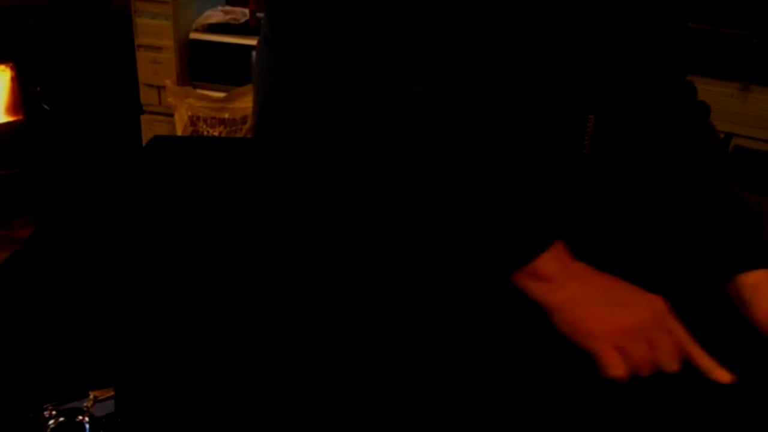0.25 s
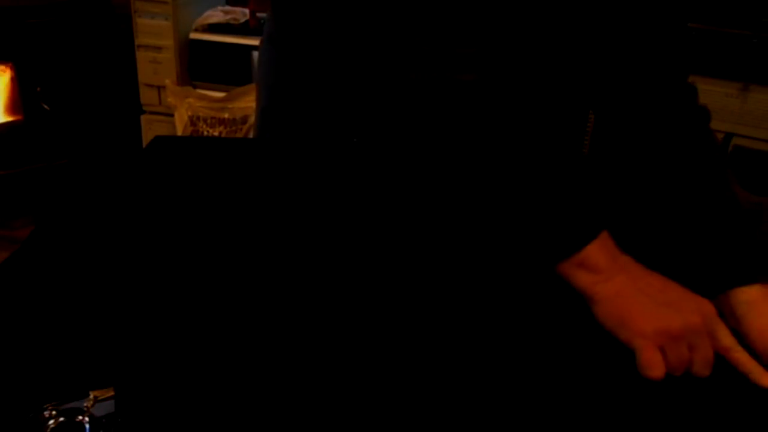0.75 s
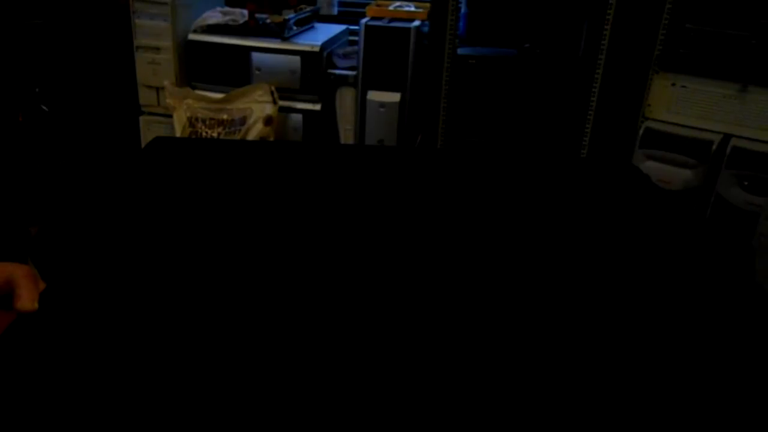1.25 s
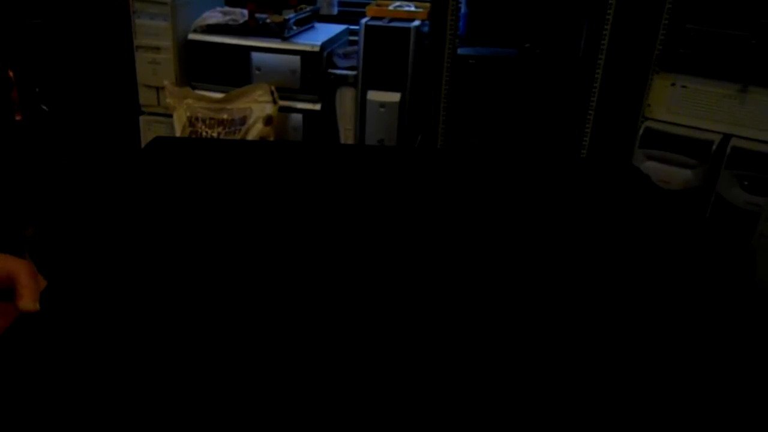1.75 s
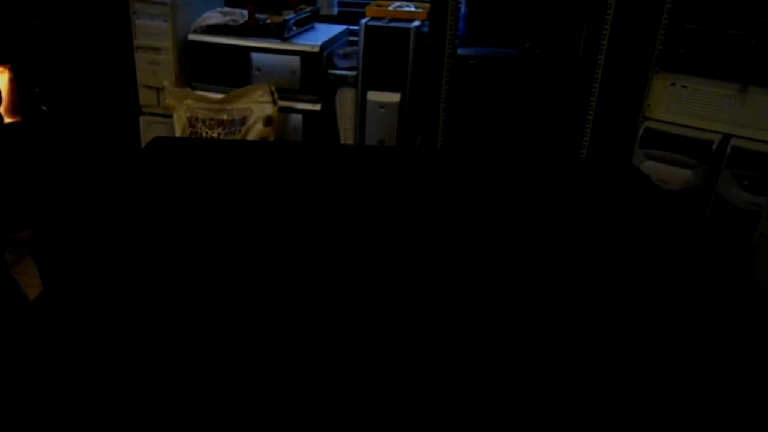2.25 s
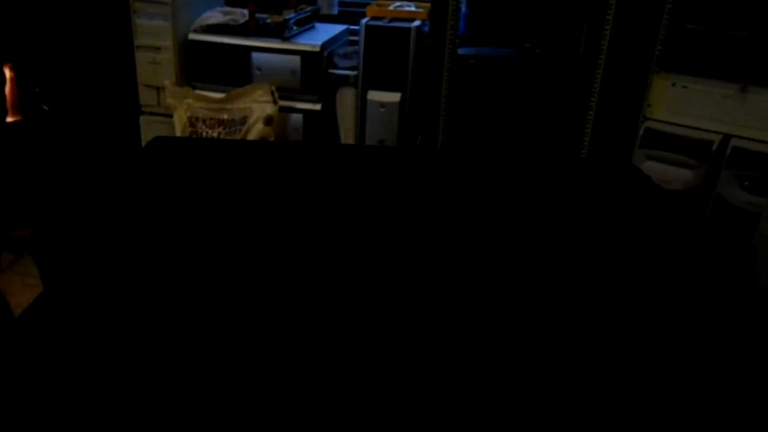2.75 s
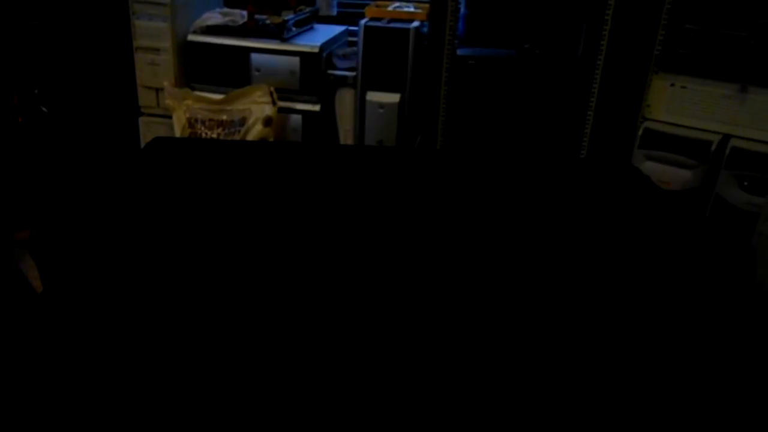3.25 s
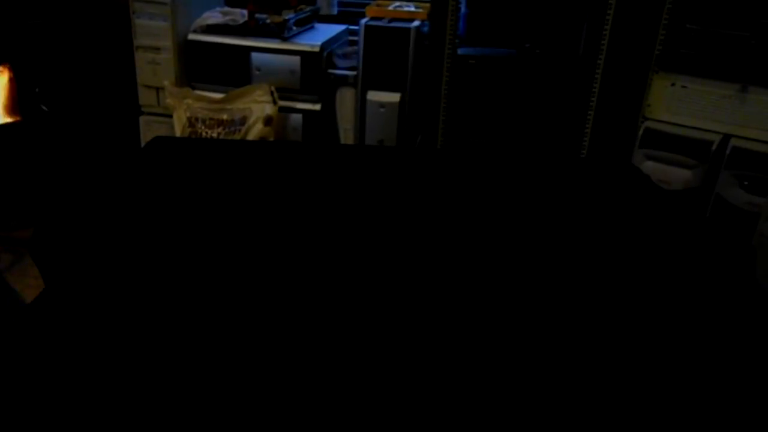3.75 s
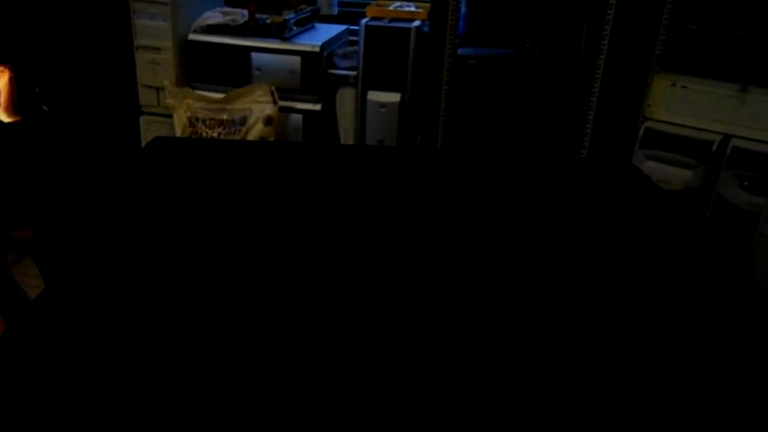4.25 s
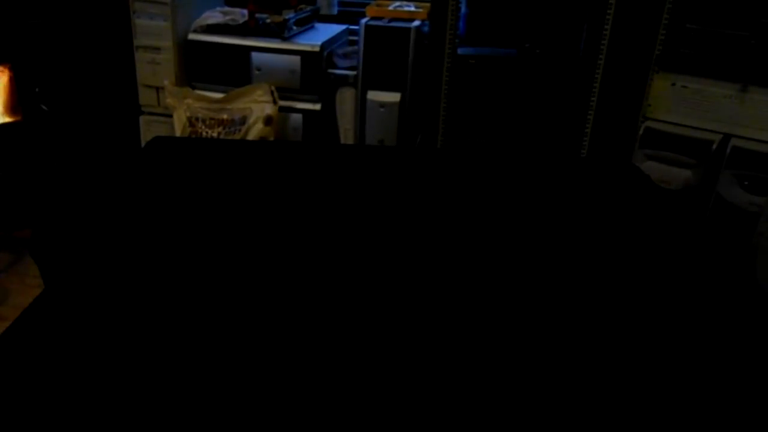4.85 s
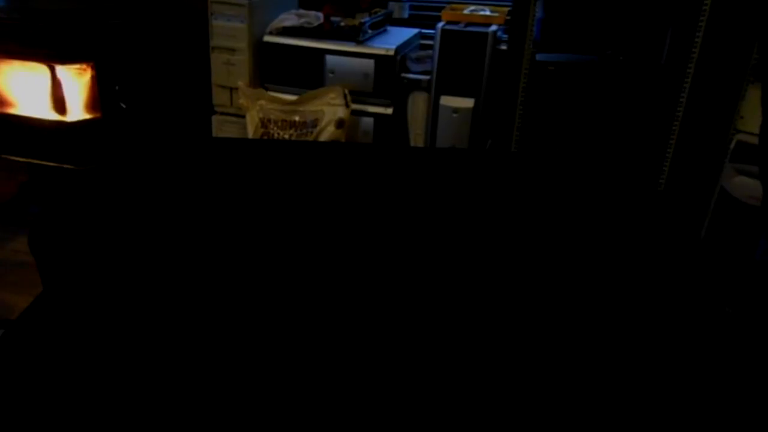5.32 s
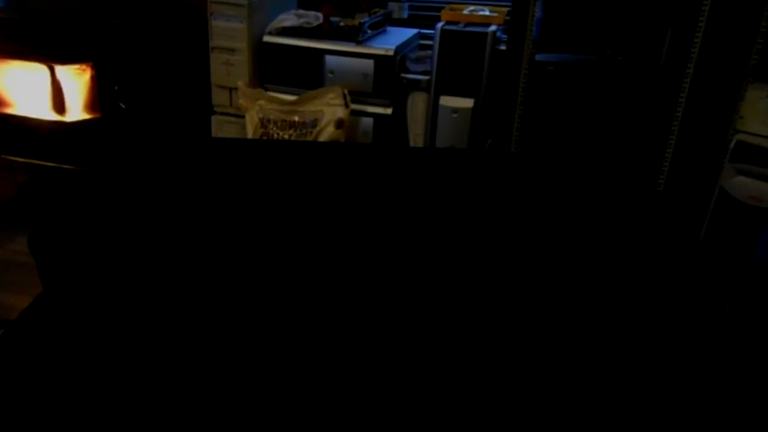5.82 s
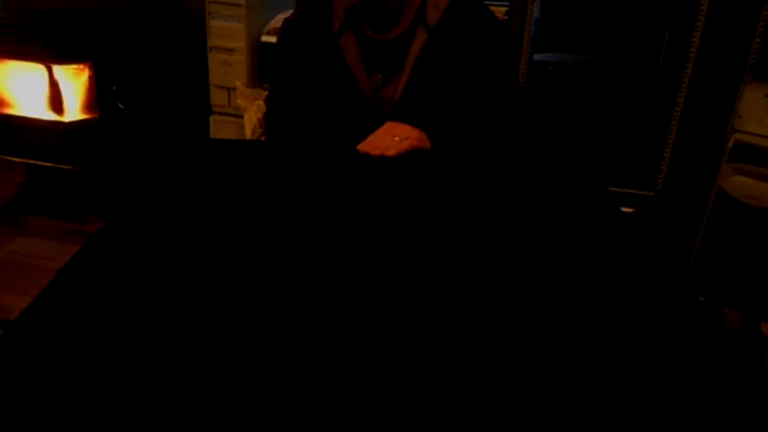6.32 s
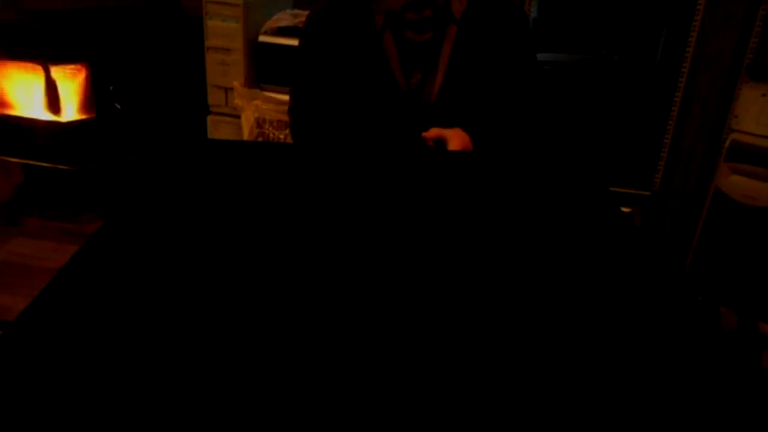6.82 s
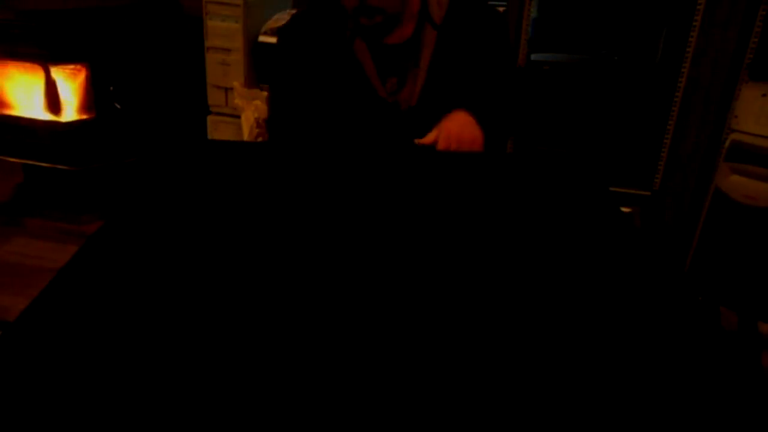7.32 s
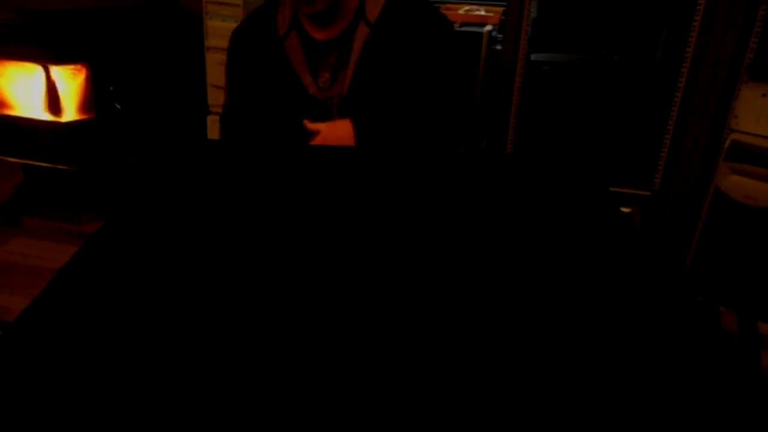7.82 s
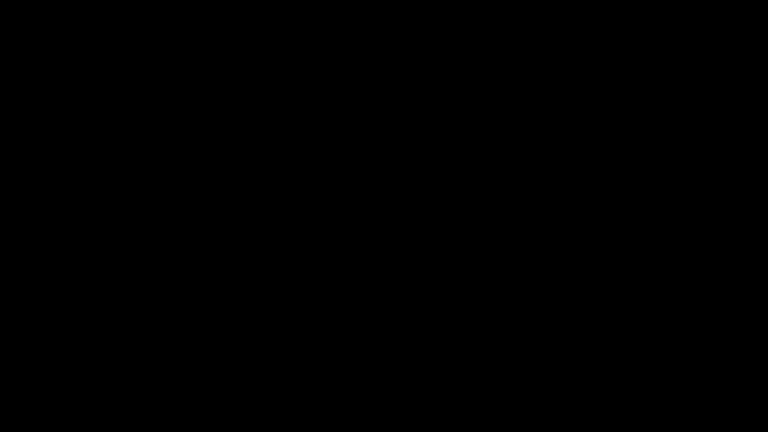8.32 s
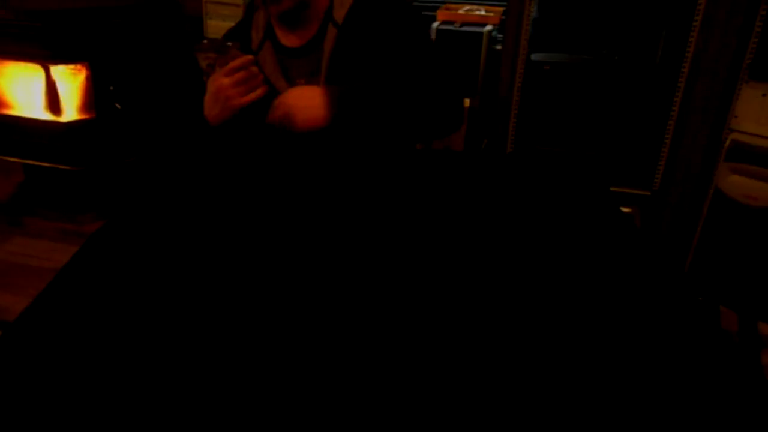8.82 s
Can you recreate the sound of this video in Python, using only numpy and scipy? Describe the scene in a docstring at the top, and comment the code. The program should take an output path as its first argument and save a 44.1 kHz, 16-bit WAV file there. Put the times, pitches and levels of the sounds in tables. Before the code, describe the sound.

In an indoor workshop, a hand staple gun fires nine loud shots through carpet into a wooden table. Before each, steel catches click as the lever is squeezed; afterwards it clacks and rings back. Soft bumps and hand strokes fill the gaps over a stove's low roar and fan hum. The close microphone overloads and ducks, and two brief dropouts fall silent.

```python
"""Staple gun in a workshop

A hand staple gun fires nine staples through carpet into a wooden table while a stove roars and its fan hums.
Steel contacts are noise bursts with pings and rattle; table, frame and lever are decaying sine modes.
The stove is shaped noise with wavering tones; bumps are low pulses, hand strokes hiss, the hinge squeaks.
Loud snaps duck the whole mix, the shots still overload, the roar steps in level and two gaps are silent."""
import sys
import numpy as np
from scipy import signal
from scipy.fft import rfft, irfft, next_fast_len
from scipy.io import wavfile
from scipy.ndimage import uniform_filter1d

SR = 44100
rng = np.random.default_rng(int(sys.argv[2]) if len(sys.argv) > 2 else 0)


def to_wav(s):
    """Save 16-bit WAV."""
    ch = np.atleast_2d(s).T  # columns
    pcm = np.round(np.clip(ch, -1, 1) * 32767)  # PCM
    wavfile.write(sys.argv[1], SR, pcm.astype(np.int16))


N = 399987
T = np.arange(SR) / SR  # one second of time for every blow

# roar and hiss of the stove: pitch_hz, level_db per Hz
STOVE_SPECTRUM = [(20, 0), (45, -15), (82, -3), (150, -2), (200, -6), (300, -5.5), (500, -5.5),
                  (880, -11.5), (1550, -19.5), (1900, -18.5), (3400, -24), (4400, -30.5), (5600, -31),
                  (8000, -36), (15000, -43)]
# tones of the stove's fan: pitch_hz, level_db against the roar
FAN_TONES = [(119.8, -10.5), (167.8, -9.5), (239.8, -11.5), (335, -16.5), (461, -14.5), (504, -13.5),
             (634, -13.5), (1341, -23.5), (2718, -26), (3480, -41)]
# the roar steps to a new level: start_s, relative level_db
ROAR_STEPS = [(0, -23.5), (.935, -25.5), (2.1, -23.5), (3.006, -26.5), (3.8, -25), (4.945, -26.5),
              (5.612, -24), (6.079, -23.5), (6.88, -22.5), (7.452, -22), (8.684, -28.5)]
# a hand brushes the carpet: start_s, end_s, level_db
STROKES = [(0.25, 0.587, -39.5), (0.684, 0.962, -41.5), (1.99, 2.098, -37), (6.118, 6.3, -35),
           (7.93, 8.36, -36), (8.234, 8.34, -30), (8.672, 8.731, -33.5), (8.699, 9.055, -44)]
# hiss of carpet fibres: pitch_hz, level_db per Hz
PILE_SPECTRUM = [(500, -17), (2500, 2), (5500, 3), (9000, 1), (14000, -6)]
# hands and gun bump the table: start_s, level_db, pitch_hz
BUMPS = [(.862, -17, 94), (1.67, -9.5, 115.4), (2.588, -7, 119), (3.079, -16, 102), (3.441, 2.5, 83),
         (3.457, -4.5, 187), (3.529, -14, 125), (4.422, -20, 88.5), (4.87, -22.5, 40), (7.65, -4, 145),
         (8.235, -24, 129), (8.713, -25.5, 109), (8.784, -28, 50.2)]
# the lever's hinge squeaks faintly: start_s, length_s, level_db, start_hz, end_hz
SQUEAKS = [(1.0, 0.083, -46, 3500, 3610), (2.062, 0.048, -33.5, 4830, 5100),
           (3.656, 0.029, -18, 3680, 3480)]
# the lever catches as it is squeezed or shifted:
# start_s, level_db, room_db, table_knock_db, ping_hz, ping_db
CATCHES = [(1.015, -31, -14.5, -20, 3540, 7), (1.2627, -6.5, -8, -8, 4250, -6),
           (2.2872, -5, -12.5, -23, 6550, -9.5), (2.596, -8.5, 0.5, -6, 8760, 3),
           (2.68, -25, 6, -20, 7000, -8), (3.013, -23.5, -13, -22, 3520, 5),
           (3.098, -7, -6, -9, 8830, -9.5), (3.553, -26, -18, -15, 7000, -8),
           (3.878, -17, -9, -12.5, 8250, -12.5), (4.037, -4.5, -3.5, -10.5, 2890, -3),
           (4.421, -24, 1, -20, 5760, 1), (4.478, -21, 0, -22, 7100, -7), (4.718, -29, 6, -20, 3300, 6),
           (5, -29.5, -15, -23, 7800, -3), (5.2827, -8.5, -6, -19, 1840, -2.5),
           (5.7171, -4.5, -9, -12, 1800, -4), (6.111, -10.5, 4, -2.5, 2120, -5.5),
           (6.9569, -10, -1, -9, 3060, -5), (7.4876, -10, 4.5, -2, 1820, 0.5),
           (8.932, -25, 3.5, -14, 3040, -3)]
# rasp of the catch: pitch_hz, level_db per Hz
CATCH_SPECTRUM = [(60, -20.5), (400, -1), (1200, -4.5), (1750, -4.5), (2100, -4), (3400, -6), (4100, -13),
                  (5500, -9.5), (6600, -10), (7200, -12), (8200, -7), (12000, -14.5)]
# base decay of the room: pitch_hz, t60_s
ROOM_T60 = [(100, 0.4), (1200, 0.48), (2000, 0.26), (4000, 0.52), (8000, 0.23), (14000, 0.22)]
# the lever springs back: start_s, level_db, room_db, ping_hz, ping_db
RETURNS = [(1.8042, -19.5, 7, 7700, -5), (1.83, 5, -7, 5250, -11), (2.7117, -0.5, -1.5, 5450, 2.5),
           (3.666, -2.5, -3.5, 3186, 5), (4.7422, -3, -0.5, 1847, -12), (4.75, -1.5, -11, 5150, 2.5),
           (4.755, -4.5, -2, 2470, -3), (7.365, -8, 5.5, 3000, -2), (7.969, -10, 9.5, 3020, -2),
           (8.845, -11.5, -3.5, 10030, -4)]
# clack of the returning lever: pitch_hz, level_db per Hz
CLACK_SPECTRUM = [(200, -31.5), (850, -18.5), (1150, 1), (1800, -5.5), (2400, -7.5), (3300, -4),
                  (4500, -8.5), (5100, -5), (6500, -7.5), (8500, -6.5), (12000, -9.5)]
# modes of the lever, free to ring once the hand lets go: pitch_hz, level_db, t60_s
LEVER_MODES = [(1043, -7.5, .3), (1187, -5.5, 0.48), (1236, -2.5, .36), (1350, -12, .25)]
# modes of the gun's steel frame: pitch_hz, level_db, t60_s
STEEL_MODES = [(1245, -5.5, 0.47), (1794, -4, 0.25), (1897, -7, 0.21), (2205, -8.5, .25), (2276, -7, 0.4),
               (2380, -6.5, 0.22), (2640, -4.5, 0.21), (3005, -4.5, 0.34), (3250, -3.5, 0.24),
               (4190, -4, 0.29), (5200, -20.5, .15), (5730, -8.5, 0.27)]
# modes of the table under the gun: pitch_hz, level_db, t60_s
TABLE_MODES = [(218, -4.5, 0.11), (285.2, -4, 0.32), (315, -9.5, 0.44), (390, 0, 0.3), (452.5, -6.5, 0.12),
               (517, -4, 0.25), (572, -1, 0.18), (622, -17.5, 0.12), (678, -6, 0.19), (825, -6, .35),
               (875, -10.5, 0.45), (914, -15, 0.16)]
# modes of the whole tabletop: pitch_hz, level_db, t60_s
THUD_MODES = [(78.8, 3, 0.36), (86.8, -2.5, 0.73), (106, -1.5, 0.23), (132.6, -1.5, 0.33), (150.4, 0, 0.4)]
# one row a staple: start_s, force_db, table_thud_db, extra knock_db around 720 Hz,
# length as a factor on the slam's decay, extra boom_db around 395 Hz
SHOTS = [(1.4075, 11.5, -6, -2.5, 1.06, 3.5), (2.363, 12, 6.5, -5, 1.17, -2), (3.209, 12, 3, -1.5, 1.07, 3),
         (4.1086, 11.5, -7, -2.5, 1.034, -2.5), (5.3197, 11, -9, 2, 1.114, 2.5),
         (5.83, 11, -7, 0.5, 1.14, -2.5), (6.303, 10.5, -3.5, 4.5, 1.06, 1.5),
         (7.032, 12.5, -14, 1.5, 1.084, 1), (7.599, 11, -8, 4.5, 1.01, -3.5)]
# slam of the striker: pitch_hz, level_db per Hz
SLAM_SPECTRUM = [(40, -36.5), (100, -11.5), (170, -14.5), (250, -5), (420, -1), (650, -6), (1000, -8.5),
                 (1500, -14), (2500, -13.5), (4300, -15.5), (7500, -13.5), (12000, -20)]
# base decay of the slam: pitch_hz, t60_s
SLAM_T60 = [(80, 0.46), (350, 0.39), (1000, 0.41), (3000, 0.41), (7000, 0.27), (13000, 0.23)]
# gaps without sound: start_s, end_s
SILENCES = [(6.843, 6.88), (8.311, 8.684)]
# tone of the microphone: pitch_hz, level_db
MICROPHONE_TONE = [(15, -3.5), (35, 7), (70, -0.5), (8500, 0.5), (10000, -2), (11100, -14), (12000, -8.5),
                   (13500, -16), (15300, -38.5)]

# gain control: treble peaks over the threshold turn the mix down, at most by the depth
THRESHOLD_DB, DEPTH_DB, DETECTOR_HZ = -11, 14.5, 1000
ATTACK_S, HOLD_S, RECOVER_DB_PER_S = 0.019, 0.2, 38.5
LOOKAHEAD_S = 0.011
STEP_DB_PER_S = 300.5  # the gain opens this fast after a step of the roar
EDGE_HZ = 15700  # top of the final band


def gain_of(db):
    """Turns decibels into an amplitude factor."""
    return 10 ** (np.asarray(db) / 20)


def evened(x):
    """Scales a signal to rms 1."""
    return x / np.sqrt(np.mean(x ** 2) + 1e-20)


def read(points, hz):
    """Reads a table on a log-frequency axis."""
    f, value = np.transpose(points)
    return np.interp(np.log(hz + 1), np.log(f + 1), value)


def add(mix, s, sound):
    """Lays a sound into the mix at time s."""
    part = mix[round(s * SR):][:len(sound)]
    part += sound[:len(part)]


def coloured(x, spectrum):
    """Filters a signal by a table of pitch_hz, level_db."""
    hz = np.fft.rfftfreq(len(x), 1 / SR)
    return irfft(rfft(x) * gain_of(read(spectrum, hz)), len(x))


def noise(spectrum, size=SR):
    """Makes noise of about rms 1 with the given spectrum."""
    white = rng.standard_normal(next_fast_len(size))
    return evened(coloured(white, spectrum))[:size]


def dying(x, t60s, stretch=1, patchy_db=2.5):
    """Lets each band die at its own speed, unevenly, as close modes beat."""
    hz, t, z = signal.stft(x, SR, nperseg=256)
    patches = evened(uniform_filter1d(rng.standard_normal(z.shape), size=9, axis=1))
    fall_db = -60 * t / (stretch * read(t60s, hz)[:, None])
    faded = z * gain_of(fall_db + patchy_db * patches)
    return signal.istft(faded, SR, nperseg=256)[1][:len(x)]


def ring(modes, rise_s, scatter=.004):
    """Rings struck modes; each blow lands on another spot, so their mix varies by about a decibel."""
    hz, db, t60 = np.transpose(modes)[:, :, None]
    detune, spot_db, phase = rng.standard_normal((3, len(modes), 1))
    tones = np.sin(2 * np.pi * (hz * (1 + scatter * detune) * T + phase))
    partials = tones * gain_of(db + spot_db) * np.exp(-np.log(1000) * T / t60)
    return partials.sum(0) * (1 - np.exp(-T / rise_s))


def ping(hz, db, ping_s=0.0037):
    """One part of the gun rings for a moment above the rest, as a decaying sine."""
    return gain_of(db) * np.sin(2 * np.pi * hz * T) * np.exp(-T / ping_s)


def rattle(per_s=160, rattle_s=0.023):
    """Loose staples and the spring chatter after a blow: random tiny clacks that die away."""
    struck = rng.random(SR) < per_s / SR
    hits = struck * rng.standard_normal(SR) * np.exp(-T / rattle_s)
    tick = noise(CLACK_SPECTRUM) * np.exp(-T / 0.002)
    return signal.fftconvolve(hits, tick)[:SR]


def stove(roar_db=-1.09, waver=0.24):
    """The fire roars as shaped noise, its fan hums in wavering tones, and both step in level together."""
    t = np.arange(N) / SR
    sound = noise(STOVE_SPECTRUM, size=N)
    knots = np.linspace(0, t[-1], 60)
    for hz, db in FAN_TONES:
        # the phase wanders at random, so the pitch wavers
        drift = np.interp(t, knots, np.cumsum(waver * rng.standard_normal(len(knots))))
        sound = sound + gain_of(db) * np.sqrt(2) * np.sin(2 * np.pi * hz * t + 2 * drift)
    starts, step_db = np.transpose(ROAR_STEPS)
    return sound * gain_of(roar_db + step_db[np.searchsorted(starts[1:], t)])


def strokes():
    """Carpet fibres hiss under a sliding hand: noise that fades in and out."""
    out = np.zeros(N)
    for start, end, db in STROKES:
        size = max(round((end - start) * SR), 2)
        hiss = noise(PILE_SPECTRUM, size=size) * signal.windows.tukey(size, .4)
        add(out, start, gain_of(db) * hiss)
    return out


def bumps(push_s=0.02):
    """Soft pushes through the carpet: a low tone and dull noise that swell and fade."""
    out = np.zeros(N)
    for s, db, hz in BUMPS:
        dull = noise([(20, -18), (hz, 0), (400, -12), (1500, -34), (8000, -55)])
        flex = np.sin(2 * np.pi * hz * T) + 0.71 * dull
        swell = (T / push_s) ** 2 * np.exp(2 * (1 - T / push_s))  # peaks at push_s
        add(out, s, gain_of(db) * flex * swell)
    return out


def squeaks(wobble=0.13):
    """Steel sticks and slips in the hinge: a short whistle that glides with an unsteady pitch."""
    out = np.zeros(N)
    for s, length, db, start_hz, end_hz in SQUEAKS:
        size = max(round(length * SR), 2)
        unsteady = evened(uniform_filter1d(rng.standard_normal(size), size=20))
        hz = np.linspace(start_hz, end_hz, size) * (1 + wobble * unsteady)
        whistle = np.sqrt(2) * np.sin(2 * np.pi * np.cumsum(hz) / SR)
        add(out, s, gain_of(db) * whistle * signal.windows.tukey(size, .5))
    return out


def catches(snap_s=0.0057, snap_db=-1.0, room_db=-8, rattle_db=-9):
    """A short rasp of steel on steel, passed on to the table and the room."""
    out = np.zeros(N)
    for s, db, wet_db, knock_db, ping_hz, ping_db in CATCHES:
        rasp = gain_of(snap_db) * noise(CATCH_SPECTRUM) * np.exp(-(T / snap_s) ** 2)
        snap = rasp + ping(ping_hz, ping_db)
        room = dying(noise(CATCH_SPECTRUM), ROOM_T60, 0.77) * (1 - np.exp(-T / 0.0014))
        tail = gain_of(room_db) * room + gain_of(rattle_db) * rattle()
        # the hand damps the table
        knock = gain_of(knock_db) * ring(TABLE_MODES, 0.0041, scatter=0.027) * np.exp(-T / 0.047)
        add(out, s, gain_of(db) * (snap + gain_of(wet_db) * tail + knock))
    return out


def returns(snap_s=0.0039, snap_db=3, room_db=-11, steel_db=-19, rattle_db=-3, lever_db=-18):
    """The lever hits its stop with the gun lifted: no table bass; lever and frame ring."""
    out = np.zeros(N)
    for s, db, wet_db, ping_hz, ping_db in RETURNS:
        clack = gain_of(snap_db) * noise(CLACK_SPECTRUM) * np.exp(-T / snap_s)
        snap = clack + ping(ping_hz, ping_db)
        tail = gain_of(room_db) * dying(noise(CLACK_SPECTRUM), ROOM_T60)
        tail = tail + gain_of(steel_db) * ring(STEEL_MODES, 0.0012) + gain_of(rattle_db) * rattle()
        lever = gain_of(lever_db) * ring(LEVER_MODES, .002, scatter=0.012)
        add(out, s, gain_of(db) * (snap + gain_of(wet_db) * tail + lever))
    return out


def shots(slam_db=2, table_db=0, steel_db=-12, crack_db=-5, crack_s=0.0065, swell_s=0.0042,
          late_db=-23, late_stretch=2.56, alike=0.55):
    """The striker cracks on the staple; gun, table and room then ring together in a dense slam."""
    out, hz = np.zeros(N), np.fft.rfftfreq(SR, 1 / SR)
    knock_band = np.exp(-(np.log2((hz + 1) / 720) / 0.42) ** 2)
    boom_band = np.exp(-((hz - 395) / 70) ** 2)
    # it is always the same table in the same room, so the shots share much of their dense ringing
    common, share = noise(SLAM_SPECTRUM), np.clip(alike, 0, 1)
    for s, force_db, thud_db, knock_db, length, boom_db in SHOTS:
        dense = np.sqrt(share) * common + np.sqrt(1 - share) * noise(SLAM_SPECTRUM)
        late = dying(noise(SLAM_SPECTRUM), SLAM_T60, late_stretch)
        slam = dying(dense, SLAM_T60, length) + gain_of(late_db) * late
        table = gain_of(table_db) * ring(TABLE_MODES, 0.005)
        steel = gain_of(steel_db) * ring(STEEL_MODES, .001)
        body = gain_of(slam_db) * slam + table + steel
        # the spot that is stapled decides how much the wood knocks and how much its main mode booms
        body = irfft(rfft(body) * gain_of(knock_db * knock_band + boom_db * boom_band), SR)
        body = body * (1 - np.exp(-T / swell_s)) * (1 - T)
        crack = gain_of(crack_db) * noise(CATCH_SPECTRUM) * np.exp(-T / crack_s)
        thud = gain_of(thud_db) * ring(THUD_MODES, 0.004, scatter=0.031)
        add(out, s, gain_of(force_db) * (body + crack) + thud)
    return out


def gain_control(x, size=44):
    """Loud snaps duck the whole sound, which swells back; after a step of the roar the gain opens fast."""
    high_pass = signal.butter(2, DETECTOR_HZ, "high", fs=SR, output="sos")
    treble = signal.sosfilt(high_pass, x)
    blocks, step_s = np.arange(0, N, size), size / SR
    peaks_db = 20 * np.log10(np.maximum.reduceat(abs(treble), blocks) + 1e-9)
    roar_steps = {round(start / step_s) for start, _ in ROAR_STEPS}
    cuts_db, cut_db, quiet_s, opening = np.zeros(len(blocks)), 0, 0, RECOVER_DB_PER_S
    for k, peak_db in enumerate(peaks_db):
        if k in roar_steps:
            quiet_s, opening = HOLD_S, STEP_DB_PER_S
        over_db = peak_db - cut_db - THRESHOLD_DB
        quiet_s += step_s
        if over_db > 0:
            cut_db = min(cut_db + over_db * step_s / ATTACK_S, DEPTH_DB)
            quiet_s, opening = 0, RECOVER_DB_PER_S
        elif quiet_s > HOLD_S:
            cut_db = max(cut_db - opening * step_s, 0)
        cuts_db[k] = cut_db
    # the cut is read ahead of time, so it acts slightly before the sound
    ahead = np.arange(N) + LOOKAHEAD_S * SR
    return x * gain_of(-np.interp(ahead, blocks, uniform_filter1d(cuts_db, size=3)))


def scene():
    """Sums all sources into one channel at the microphone."""
    background = stove() + strokes() + bumps() + squeaks()
    return (background + catches() + returns() + shots())[None]


def record(dry, ceiling=1.19, knee=10):
    """Ducks, overloads softly, dulls the top, clips at full scale, mutes two gaps and limits the band."""
    ducked = gain_control(dry[0])
    overloaded = ducked / (1 + abs(ducked / ceiling) ** knee) ** (1 / knee)
    sound = np.clip(coloured(overloaded, MICROPHONE_TONE), -.96, .96)
    t = np.arange(N) / SR
    for start, end in SILENCES:
        # each edge of a gap fades over 6.3 ms
        sound = sound * np.clip(np.maximum(start - t, t - end) / 0.0063 + .5, 0, 1)
    low_pass = signal.firwin(511, EDGE_HZ, window=("kaiser", 9), fs=SR)
    return signal.oaconvolve(sound, low_pass, "same")[None]


dry = scene()
out = record(dry)
to_wav(out)
```